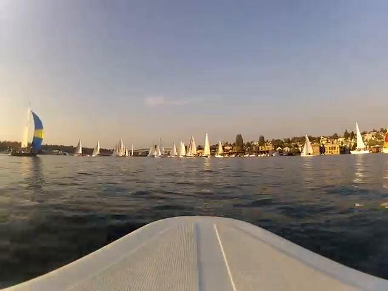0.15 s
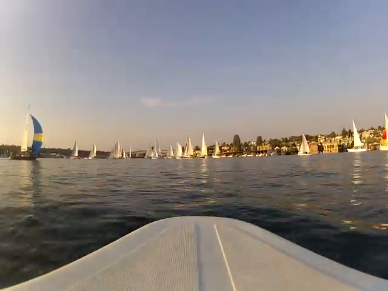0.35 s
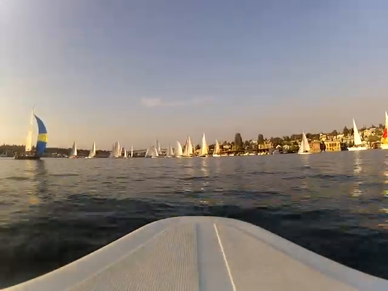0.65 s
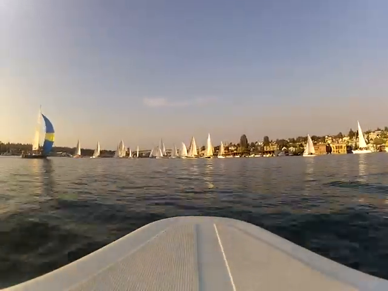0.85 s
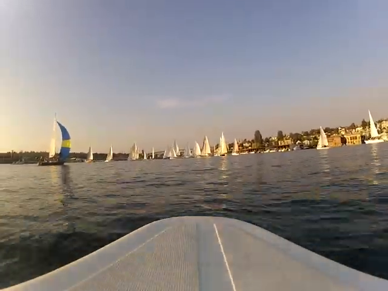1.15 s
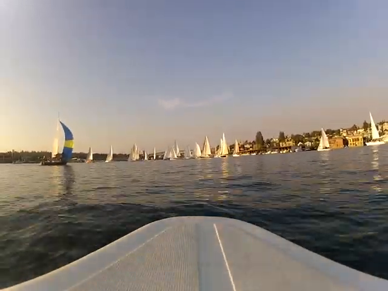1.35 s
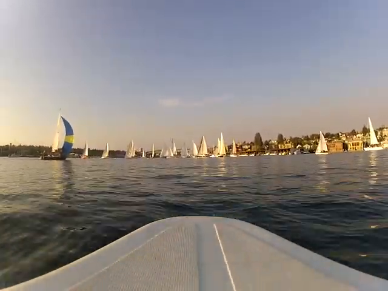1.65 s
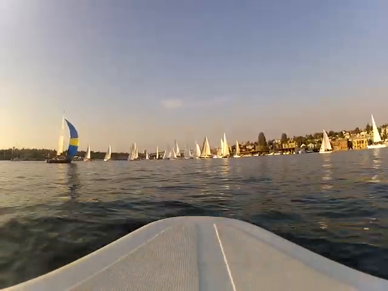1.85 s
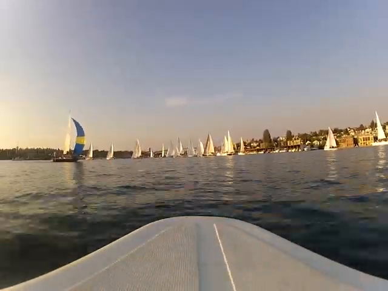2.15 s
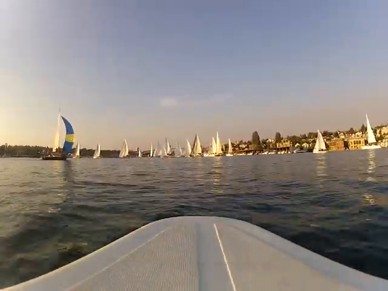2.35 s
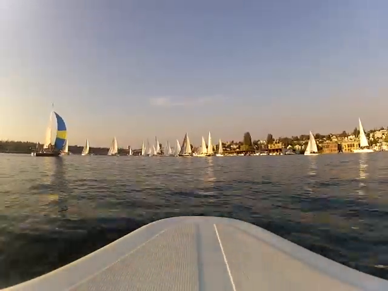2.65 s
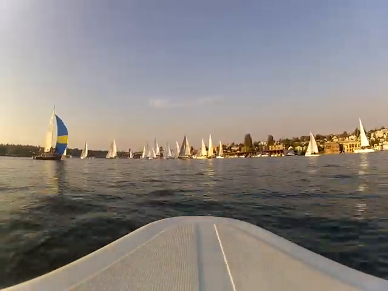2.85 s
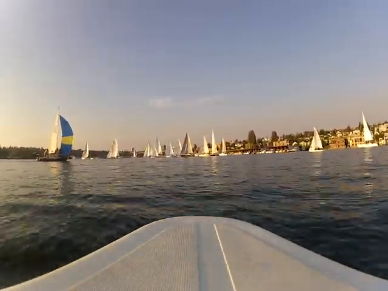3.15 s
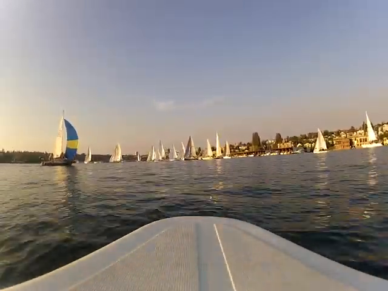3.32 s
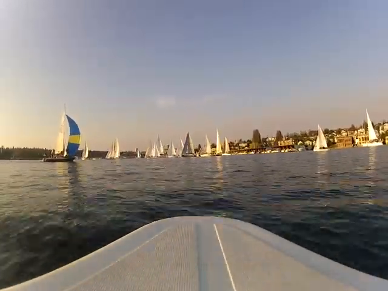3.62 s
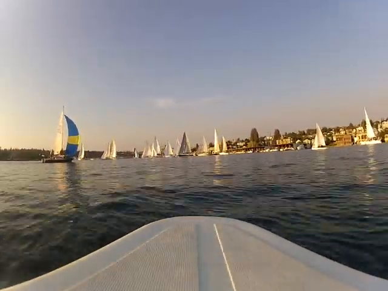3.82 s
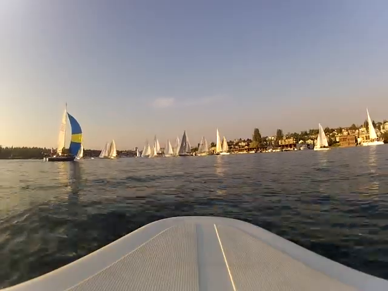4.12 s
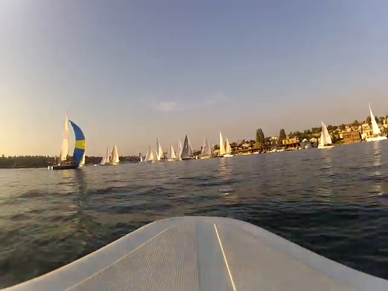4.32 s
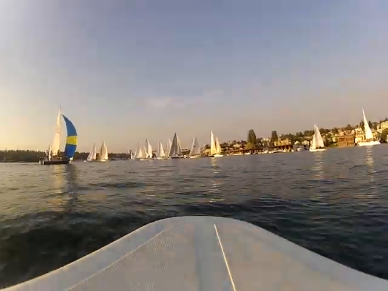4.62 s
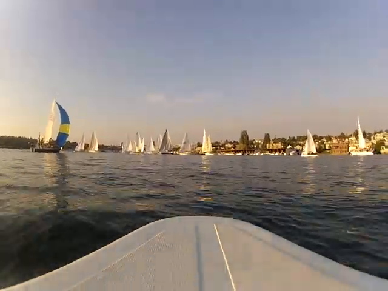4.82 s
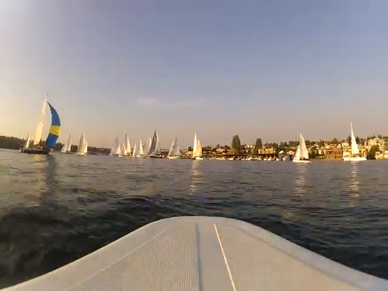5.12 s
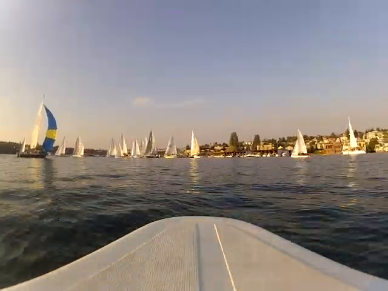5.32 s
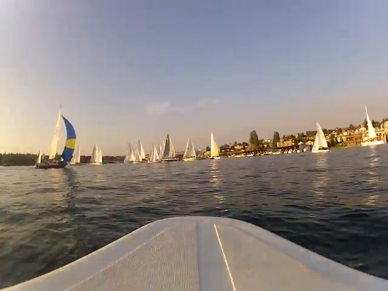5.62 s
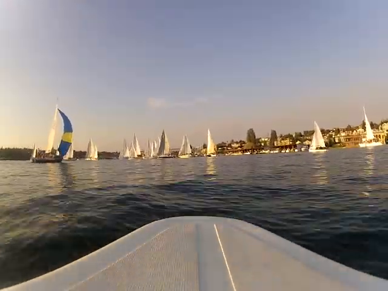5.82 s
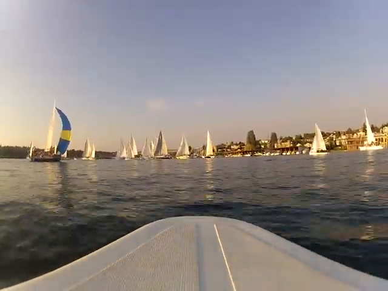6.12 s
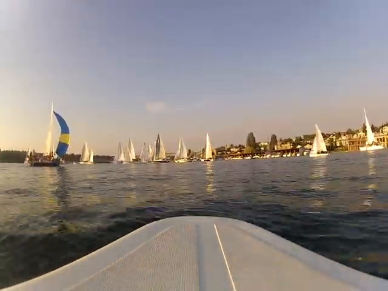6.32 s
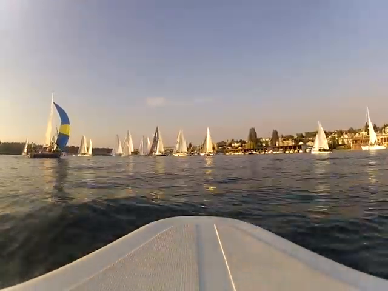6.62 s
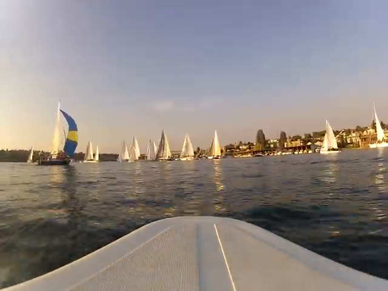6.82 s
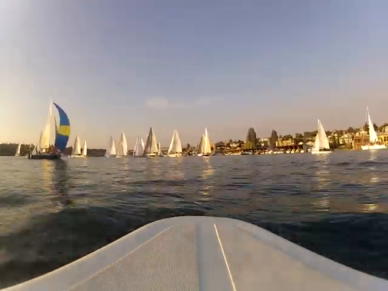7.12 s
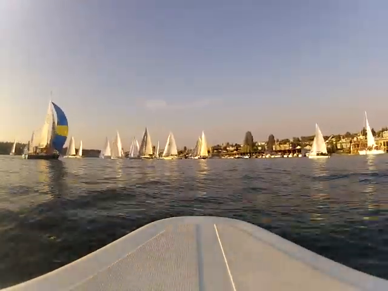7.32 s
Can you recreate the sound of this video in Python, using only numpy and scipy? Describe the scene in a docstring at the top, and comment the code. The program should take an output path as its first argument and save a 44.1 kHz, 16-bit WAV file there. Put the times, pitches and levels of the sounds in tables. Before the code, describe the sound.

Wavelets slap and gurgle along a small sailboat's hull, quiet at first then busier, with low hull booms, one soft thud and a brief creak.

```python
"""Small sailboat over ripples

A small sailboat slides over ripples; a one-port camera in a sealed case sits on the foredeck.
Wavelets slap and gurgle along the hull: bands of noise swell briefly and sine bubbles ring, over a wash.
The hull booms low as resonated noise; one thud sums damped modes, one creak is stick-slip pulses in resonators.
Deck and case colour the water strongly; a faint steady hiss lies underneath."""
import sys
import numpy as np
from scipy import signal
from scipy.fft import rfft, irfft, next_fast_len
from scipy.io import wavfile
from scipy.ndimage import uniform_filter1d

SR = 44100
rng = np.random.default_rng(int(sys.argv[2]) if len(sys.argv) > 2 else 0)


def wav_record(signal):
    """Record a signal, one row per channel, as 16-bit PCM in the file named by sys.argv[1]."""
    frames = np.transpose(np.atleast_2d(signal))
    bounded = np.clip(frames, -1, 1)
    # unit amplitude maps onto the largest positive 16-bit level
    quanta = np.round(bounded * 32767).astype(np.int16)
    wavfile.write(sys.argv[1], SR, quanta)


N = 329427
T = np.arange(N) / SR
STEP = 44  # samples per step of the band envelopes
STEPS_S = T[::STEP]
SIZE = next_fast_len(N)
BIN_HZ = np.maximum(np.arange(SIZE // 2 + 1) * SR / SIZE, 1)
BANDS_HZ = 700 * (np.exp(np.arange(.1, 2.95, .1)) - 1)  # band centres in even steps for the ear
BELLY_TOP_HZ, SPRAY_FOOT_HZ = 518.4, 2963  # limits of the belly, slap and spray ranges


def undb(db):
    """Decibels are logarithmic: gives the amplitude, or the power if the level is doubled first."""
    return 10 ** (np.asarray(db) / 20)


def unit(x):
    """Root mean square as the measure of strength: scales a signal to rms 1."""
    return x / np.sqrt(np.mean(x ** 2))


def walk(rate, step=1):
    """Slow random modulation: levels held 1 / rate s and slewed twice, one per step samples; spread near 1."""
    hold = max(int(SR / step / rate), 1)
    count = len(T[::step])
    held = rng.standard_normal(2000)[np.arange(count) // hold]
    slewed = uniform_filter1d(held, hold)
    return 1.3 * uniform_filter1d(slewed, hold)


def resonate(x, hz, width_hz):
    """Simple resonance: a two-pole band-pass with gain 1 at the centre."""
    return signal.lfilter(*signal.iirpeak(hz, hz / width_hz, fs=SR), x)


def by_range(belly, slap, spray):
    """Division of the spectrum: one value for each band, chosen by its range."""
    upper = np.where(BANDS_HZ < SPRAY_FOOT_HZ, slap, spray)
    return np.where(BANDS_HZ < BELLY_TOP_HZ, belly, upper)


def add(line, s, shape):
    """Superposition: lays a shape onto a line from time s."""
    i = max(int(s * SR), 0)
    line[i:i + len(shape)] += shape[:len(line) - i]


def swell(u, rise=0.52, tail=0.15):
    """Envelope of a brief splash: it swells, holds and drains away; u is time in slap lengths."""
    attack = np.sin(np.pi / 2 * np.clip(u / rise, 0, 1)) ** 2
    return attack / (1 + np.exp(np.minimum((u - 1) / (tail / 2), 50)))


def hiss(level_db=-78.5, corner_hz=2526):
    """Low-passed white noise: a steady dull hiss, most likely the microphone's own."""
    dull = signal.lfilter(*signal.butter(2, corner_hz, fs=SR), rng.standard_normal(N))
    return undb(level_db) * unit(dull)


def waves(column, rise_db_s, fall_db_s):
    """Exponential growth and decay: summed power of waves that rise and fall at steady rates in dB."""
    # Waves that lift the hull. Each row: time of the peak in seconds, boom level in dB, slosh level in dB.
    wave_rows = [(.23, -62, -62), (.77, -61, -72), (1.06, -46.5, -54), (1.29, -44, -52), (1.57, -47.5, -46),
                 (1.67, -42.5, -51), (1.91, -37.5, -61), (2.14, -48.5, -59), (2.411, -51, -53),
                 (2.54, -44.5, -54), (2.83, -53, -69), (3.12, -53, -67), (3.4, -44, -52), (3.66, -53, -46),
                 (3.93, -47.5, -40), (4.37, -50, -63), (4.6, -60, -48.5), (4.8, -43.5, -44),
                 (5.1, -41.5, -47), (5.3, -49, -61), (5.55, -46.5, -45), (5.84, -49, -63),
                 (6.12, -51, -46.5), (6.36, -50.5, -44.5), (6.66, -45.5, -62), (6.99, -50.5, -58),
                 (7.28, -51, -40), (7.39, -44, -48)]
    s, db = np.array(wave_rows)[:, [0]], np.array(wave_rows)[:, [column]]
    drop_db = np.where(STEPS_S < s, rise_db_s * (s - STEPS_S), fall_db_s * (STEPS_S - s))
    return (undb(db - drop_db) ** 2).sum(axis=0)


def boom(mode_hz=43, width_hz=21, calm_db=-60.5):
    """Forced resonance: the lowest mode of the hull, shaken by each wave."""
    shake = resonate(rng.standard_normal(N), mode_hz, 2.8 * width_hz)
    power = undb(2 * calm_db) + waves(column=1, rise_db_s=133, fall_db_s=87)
    return np.interp(T, STEPS_S, np.sqrt(power)) * unit(resonate(shake, mode_hz, width_hz))


def thud(start_s=1.757):
    """Modal decay after a soft heavy blow on deck; low modes build up late and the water soon stills them."""
    # Modes of the deck. Each row: frequency in Hz, level in dB before rise and decay,
    # time to fall 60 dB in seconds, rise time in seconds.
    modes = [(47.5, -15, 0.17, .026), (100.8, -28, 0.08, 0.0055), (195, -25, 0.06, 0.0043),
             (275.3, -27, 0.05, 0.00153), (1000, -35.5, 0.0032, 0.00055)]
    t = np.maximum(T - start_s, 0)
    total = np.zeros(N)
    for hz, db, t60, rise in modes:
        envelope = (1 - np.exp(-(t / rise) ** 2)) * 1000 ** -(t / t60) ** 2
        total -= undb(db) * envelope * np.sin(2 * np.pi * hz * t)
    return total


def creak(rough=.04, rub=.3):
    """Stick-slip friction in the rig: uneven pulses and rubbing noise ring the deck."""
    # Course of the creak. Each row: time in seconds, mean slip rate in Hz, level in dB.
    course = [(3.239, 215.6, -50), (3.269, 225, -38), (3.30, 225.8, -44.5), (3.336, 236.1, -28),
              (3.356, 231.5, -49), (3.385, 217.6, -29), (3.41, 210, -40.5), (3.451, 203, -47)]
    # Resonances of the deck. Each row: frequency in Hz, width in Hz of each of two passes, relative level in dB.
    resonances = [(219, 100, 14), (475, 180, 12.5), (696, 105, 8), (1000, 200, -17), (2000, 750, -16),
                  (11500, 1500, -18)]
    s, hz, db = np.transpose(course)
    phase = np.cumsum(np.interp(T, s, hz) * (1 + rough * walk(120))) / SR
    slips = np.diff(np.floor(phase), prepend=0) * undb(2.1 * walk(220))
    drive = unit(slips) + rub * rng.standard_normal(N)
    body = np.zeros(N)
    for mode_hz, width_hz, mode_db in resonances:
        ring = resonate(resonate(drive, mode_hz, width_hz), mode_hz, width_hz)
        body += undb(mode_db) * unit(ring)
    return unit(body) * undb(np.interp(T, s, db, -120, -120))


def case_gain(hz):
    """Transmission through a resonant enclosure: relative amplitude response of deck and case."""
    # Broad colour of deck and case. Each row: frequency in Hz, relative level in dB.
    colour = [(41, -11), (70, -7.5), (173, 1), (533, -11), (934, -1), (1290, -9.5), (1990, -3),
              (2930, -15.5), (3340, -32), (5030, -20), (5850, -65), (6950, -31), (8630, -28),
              (10000, -13.5), (12200, -31), (15800, -67), (22000, -120)]
    # Resonances and notches added to it. Each row: centre in Hz, width in Hz, height in dB.
    peaks = [(722, 69, 6.5), (1850, 170, 0.5), (3950, 1010, 8), (4530, 900, -8.5), (6880, 520, 5.5),
             (9865, 260, 3), (5940, 830, 17), (8670, 190, -24)]
    corners_hz, corners_db = np.transpose(colour)
    db = np.interp(np.log(hz), np.log(corners_hz), corners_db)
    return undb(db + sum(d / (1 + (2 * (hz - f) / w) ** 2) for f, w, d in peaks))


def case_noises():
    """Subtractive filtering: narrow bands of noise in the colour of the case; each range sums to rms 1."""
    noise = rfft(rng.standard_normal(SIZE)) * case_gain(BIN_HZ)
    count = len(BANDS_HZ)
    place = np.interp(BIN_HZ, BANDS_HZ, np.arange(count))
    bands = np.zeros((count, N))
    for k in range(count):
        window = np.cos(np.pi / 2 * np.clip(place - k, -1, 1))  # neighbours cross over at equal power
        bands[k] = irfft(noise * window, SIZE)[:N]
    zone = by_range(0, 1, 2)
    for k in range(3):
        bands[zone == k] /= np.sqrt(np.mean(bands[zone == k] ** 2, axis=1).sum())
    return bands


def bubble(line, s, db, hz, length, phase, climb=2.0):
    """Volume resonance: a pocket of air rings, and its pitch climbs as it nears the surface."""
    t = np.arange(int(3 * length * SR)) / SR
    cycles = hz * t * (1 + climb * (t - length)) + phase
    add(line, s, undb(db) * swell(t / length) * np.sin(2 * np.pi * cycles))


def trickle(rings, wash_db, count=420):
    """Bubble resonance at random moments: lone bubbles pop in the wake, louder where the case resonates."""
    for c in rng.random((count, 5)):
        hz = 450 * 6.47 ** c[1]
        db = wash_db[int(c[0] * N)] + 0.54 - 2.55 * np.log(1 - .99 * c[2])
        db += 20 * np.log10(case_gain(hz))
        bubble(rings, c[0] * T[-1], db, hz, (4 + 6 * c[3]) / hz + 0.0035, c[4])


def ripples(count=1700, reach_bands=2.23):
    """Random superposition: small laps and specks in a few neighbouring bands, a power factor on the wash."""
    band = np.arange(len(BANDS_HZ))
    lift = np.zeros((len(band), len(STEPS_S)))
    for c in rng.random((count, 4)):
        i = int(c[0] * len(STEPS_S))
        length_s = .006 + .014 * c[1] ** 2
        shape = swell(STEPS_S[:60] / length_s, rise=.8)[:len(STEPS_S) - i]  # 60 steps outlast any lap
        reach = np.exp(-((band - c[2] * len(band)) / reach_bands) ** 2)
        gain = undb(1.5 - 3.1 * np.log(1 - .993 * c[3]))
        lift[:, i:i + 60] += (gain * np.outer(reach, shape)) ** 2
    return lift


def slaps(rings, patchy_db=3.0, scatter_s=0.0027):
    """Impact of water on the hull: clusters of patches, each band with its own size and moment, lows late."""
    # Wavelet slaps. Each row: nominal start in seconds, reference level in dB, nominal length in seconds,
    # nominal gurgle pitch in Hz, then gurgle and spray in dB re the slap, before the offsets below.
    slap_rows = [(0.013, -51, 0.017, 750, 4, -25), (0.092, -44, 0.015, 830, -9, -26),
                 (0.119, -39.5, 0.017, 730, -15, -15.5), (0.207, -49.5, 0.016, 1000, -7, -11),
                 (0.36, -50, 0.012, 1000, -20, -15), (0.412, -39, 0.017, 1044, -5.5, -20),
                 (0.445, -52, 0.019, 704, 5, -20), (0.477, -44.5, .023, 1170, -6, -20),
                 (0.51, -46, 0.015, 1140, -7, -17), (0.571, -50, 0.011, 900, -10, -18),
                 (0.615, -47, 0.011, 900, -12, -18), (0.652, -45.5, 0.012, 690, 7, -29),
                 (0.676, -42.5, 0.011, 690, -12, -25), (0.705, -55, 0.019, 764, 14.5, -16),
                 (0.753, -52.5, .018, 746, 8, -21), (0.83, -42.5, 0.018, 1003, -13.5, -19.5),
                 (0.9, -31, 0.018, 1120, -20, -14), (0.949, -40, 0.034, 822, -2, -23),
                 (1.075, -45.5, 0.024, 720, -14, -9), (1.113, -27, 0.019, 1000, -8.5, -20.5),
                 (1.15, -47, 0.033, 1000, -4, -15), (1.205, -36, 0.019, 718, -13.5, -22.5),
                 (1.263, -31, 0.0085, 746, -19.5, -14.5), (1.298, -30, 0.014, 420, 0, -20),
                 (1.327, -32, .018, 720, -9, -15), (1.407, -36.5, 0.014, 895, -4, -15),
                 (1.461, -30, 0.011, 680, -30, -19.5), (1.508, -38, 0.013, 720, -1.5, -17),
                 (1.596, -40.5, 0.016, 810, -18, -9.5), (1.734, -40, 0.018, 630, 3, -14.5),
                 (1.872, -38, 0.041, 883, -14, -19.5), (1.994, -32, 0.018, 940, -5, -17),
                 (2.02, -27.5, 0.025, 701, -4, -16.5), (2.238, -32.5, 0.034, 919, -25, -21),
                 (2.388, -37.5, .009, 1210, -25, -9), (2.409, -19.5, .0114, 740, -8, -21),
                 (2.467, -26.5, 0.012, 800, -25, -21), (2.535, -19, 0.031, 710, -28, -19.5),
                 (2.581, -41, 0.014, 795, 6.5, -29), (2.687, -30, 0.019, 863, -3.5, -23),
                 (2.708, -31, 0.026, 1130, -10, -13.5), (2.825, -32, .019, 811, -13, -21.5),
                 (2.857, -28.5, 0.015, 1010, -27, -21), (2.889, -31, 0.021, 730, -27, -15.5),
                 (2.956, -27.5, 0.014, 1100, -23, -20.5), (3.097, -20.5, 0.025, 740, -25, -23.5),
                 (3.15, -30.5, 0.016, 1160, -27, -17.5), (3.217, -27.5, .014, 714, -24, -16.5),
                 (3.269, -29, 0.025, 730, -4.5, -17.5), (3.334, -35, 0.019, 477, 9, -14),
                 (3.39, -29, 0.011, 453, 2, -16), (3.573, -24.5, 0.016, 792, 3, -22.5),
                 (3.656, -21.5, 0.016, 778, -6.5, -20.5), (3.694, -33.5, 0.036, 706, -17, -17.5),
                 (3.75, -31, 0.019, 870, -15, -21), (3.785, -40, 0.01, 930, 6.5, -18),
                 (3.893, -36, 0.053, 700, -0.5, -16), (3.939, -27.5, 0.028, 694, -6.5, -20),
                 (4.016, -27, .017, 700, -11, -17.5), (4.202, -31.5, 0.0074, 910, -22, -22),
                 (4.238, -41, 0.013, 950, -8, -17), (4.322, -20.5, 0.033, 716, -14.5, -18.5),
                 (4.379, -32.5, 0.013, 1060, -22, -19), (4.473, -29.5, 0.014, 845, -24.5, -13),
                 (4.504, -31.5, 0.012, 756, -20, -13.5), (4.591, -31.5, 0.01, 725, -9.5, -17.5),
                 (4.632, -45.5, 0.018, 890, -15, -9), (4.682, -36.5, 0.021, 1000, -5, -14),
                 (4.698, -30, 0.05, 826, -6, -19.5), (4.765, -26, 0.0086, 805, -10, -13.5),
                 (4.83, -32, 0.043, 950, -17, -19), (4.889, -26, 0.02, 687, -13, -17.5),
                 (5.02, -29.5, 0.02, 1000, -27, -15), (5.067, -32, 0.017, 695, -31, -22),
                 (5.132, -37.5, 0.0094, 730, -14, -9.5), (5.209, -25, 0.037, 740, -18, -17.5),
                 (5.226, -19.5, 0.02, 700, -15, -16.5), (5.327, -24.5, 0.024, 968, -7, -23),
                 (5.368, -25.5, 0.021, 1000, -12, -16), (5.416, -33.5, .015, 1043, -6, -18),
                 (5.505, -24.5, 0.025, 786, -9, -20.5), (5.606, -37, .025, 1143, -6, -12.5),
                 (5.735, -27.5, 0.026, 710, -12, -17), (5.776, -27.5, 0.02, 1139, -2.5, -19),
                 (5.869, -48.5, .012, 707, 13, -29), (5.928, -32, 0.021, 910, -7, -19),
                 (5.953, -26, 0.016, 1040, -22, -20), (6.065, -26.5, .017, 946, -3, -17),
                 (6.111, -31, 0.036, 814, -24, -15.5), (6.214, -44, 0.0081, 750, -18.5, 2),
                 (6.274, -36, .01, 690, -5, -17), (6.325, -31, 0.045, 750, -10.5, -15),
                 (6.372, -29, .015, 510, -12.5, -14.5), (6.438, -42, 0.0077, 900, -20, -4),
                 (6.445, -26, 0.012, 934, -1, -16.5), (6.508, -33, 0.02, 744, -18, -20),
                 (6.527, -29.5, 0.021, 1028, 3.5, -19), (6.552, -31.5, 0.042, 940, -16.5, -18),
                 (6.622, -46, .015, 900, -15, -12), (6.71, -25, 0.015, 854, -2, -19.5),
                 (6.757, -30.5, 0.031, 740, -22, -17), (6.84, -33.5, 0.013, 923, -23, -16),
                 (6.888, -32.5, .016, 941, -2, -23), (6.979, -23.5, .04, 1009, -23, -19),
                 (7.046, -29, 0.0099, 1067, -19, -17.5), (7.11, -38, 0.018, 887, -2, -10),
                 (7.272, -23, 0.031, 1000, -20.5, -19.5), (7.362, -34.5, 0.027, 1070, -22, -19.5),
                 (7.454, -20.5, 0.02, 990, -23, -20)]
    drop_hz, drop_spread = 1968, 0.0466  # drops ring near the resonance of the case
    tilt_db = 5 * np.log2(np.minimum(BANDS_HZ / 300, 1))  # slaps hardly reach the deep bass
    power = np.zeros((len(BANDS_HZ), len(STEPS_S)))
    chance = rng.standard_normal((len(slap_rows), 3, len(BANDS_HZ)))
    for (s, db, length, hz, gurgle_db, spray_db), c in zip(slap_rows, chance):
        band_db = db + by_range(-19, -13, spray_db - 5.5) + tilt_db
        band_db = band_db + patchy_db * by_range(1.44, 1.19, 0.92) * c[0]
        start = s + by_range(0.0013, -0.0051, -0.0041) + scatter_s * c[1]
        span = max(length, .004) * by_range(1.21, 1.19, 1.0) * np.exp(0.21 * c[2])
        near = slice(max(int((s - .03) * SR / STEP), 0), int((s + .12) * SR / STEP))
        shape = swell((STEPS_S[near] - start[:, None]) / span[:, None])
        power[:, near] += (undb(band_db)[:, None] * shape) ** 2
        bubble(rings, s + 0.002944, db + gurgle_db - 2.0, hz, 0.8 * length, c[0, 0])
        bubble(rings, s - .001, db - 8, drop_hz * np.exp(drop_spread * c[1, 0]), 0.55 * length, c[0, 1])
    return power


def water(wash_db, slosh_db):
    """Turbulent noise in bands: a patchy wash with ripples, bubbles and slaps; the slosh swells with waves."""
    rings = np.zeros(N)
    flicker = np.array([walk(22, step=STEP) for _ in BANDS_HZ])
    slosh_power = undb(2 * slosh_db[::STEP]) + waves(column=2, rise_db_s=246, fall_db_s=215)
    slosh_db = 10 * np.log10(slosh_power)
    upper_db = wash_db[::STEP] + by_range(0, -2.1, -12.5)[:, None]
    bed_db = np.where((BANDS_HZ < BELLY_TOP_HZ)[:, None], slosh_db, upper_db)
    bed_db = bed_db + by_range(1.44, 2.32, 2.2)[:, None] * walk(14, step=STEP)  # shared by all bands
    bed_db = bed_db + by_range(1.8, 2.47, 3.6)[:, None] * flicker  # separate in each band
    steady, lapping = by_range(0.47, 0.31, 0.16)[:, None], by_range(0.14, 1.18, 1.03)[:, None]
    power = undb(2 * bed_db) * (steady + lapping * ripples()) + slaps(rings)
    trickle(rings, wash_db)
    noise = sum(np.interp(T, STEPS_S, np.sqrt(p)) * n for p, n in zip(power, case_noises()))
    return rings + noise


def scene():
    """Mid-side principle: one microphone port feeds both channels, which differ only faintly."""
    # Running water. Each row: time in seconds, base level of the wash in dB, base level of the low slosh in dB.
    flow = [(0, -61, -58), (.4, -66, -60.5), (.9, -62, -59.5), (1.1, -58.5, -52), (1.5, -56.5, -57.5),
            (1.8, -52.5, -52), (2.0, -52.5, -51), (2.4, -49.5, -57), (3.0, -55, -55.5), (3.2, -51, -51),
            (3.31, -35, -31), (3.42, -44.5, -38), (3.52, -48, -53.5), (4.1, -49.5, -53),
            (4.5, -50.5, -54.5), (4.75, -49.5, -49.5), (5.3, -47, -47.5), (5.66, -52.5, -52),
            (5.8, -46, -50), (6.3, -52.5, -58), (6.75, -46.5, -49), (6.9, -50, -50), (7.47, -48.5, -55.5)]
    # Difference between the channels. Each row: frequency in Hz, side level in dB re mid.
    apart = [(60, -78), (110, -76), (190, -72), (350, -73), (630, -44.5), (1130, -16.5), (2020, -62),
             (3630, -31.5), (6530, -20), (9000, -54), (11700, -30)]
    s, *columns = np.transpose(flow)
    wash_db, slosh_db = (np.interp(T, s, c) for c in columns)
    mono = water(wash_db, slosh_db) + boom() + thud() + creak() + hiss()
    apart_hz, apart_db = np.transpose(apart)
    gain = undb(np.interp(np.log(BIN_HZ), np.log(apart_hz), apart_db))
    side = irfft(1j * gain * rfft(mono, SIZE), SIZE)[:N]  # a quarter cycle from the mid
    return np.array([mono + side, mono - side])


def record(dry):
    """Band limiting: the camera cuts the deepest bass and the top."""
    firm = signal.sosfilt(signal.butter(2, 26, "high", fs=SR, output="sos"), dry)
    top_hz = 12100
    return signal.sosfilt(signal.ellip(10, .2, 80, top_hz, fs=SR, output="sos"), firm)


dry = scene()
out = record(dry)
wav_record(out)
```